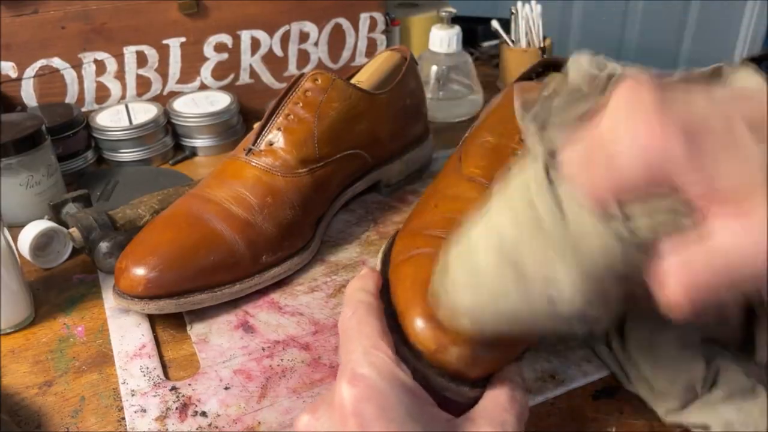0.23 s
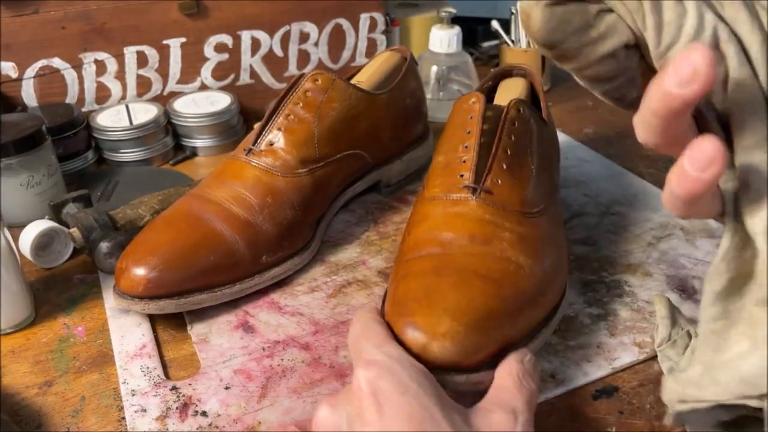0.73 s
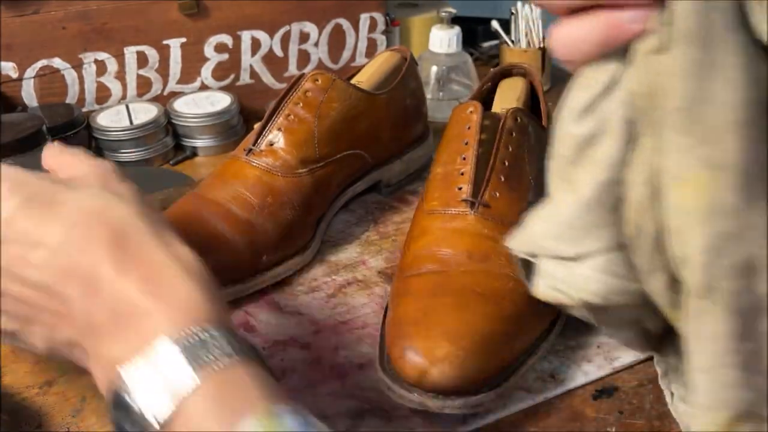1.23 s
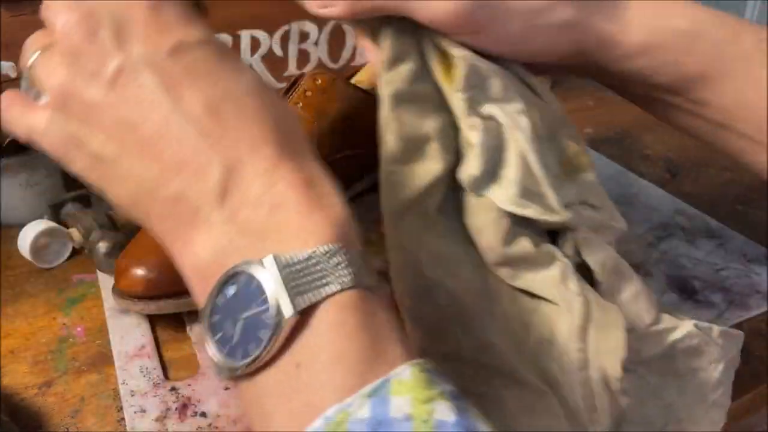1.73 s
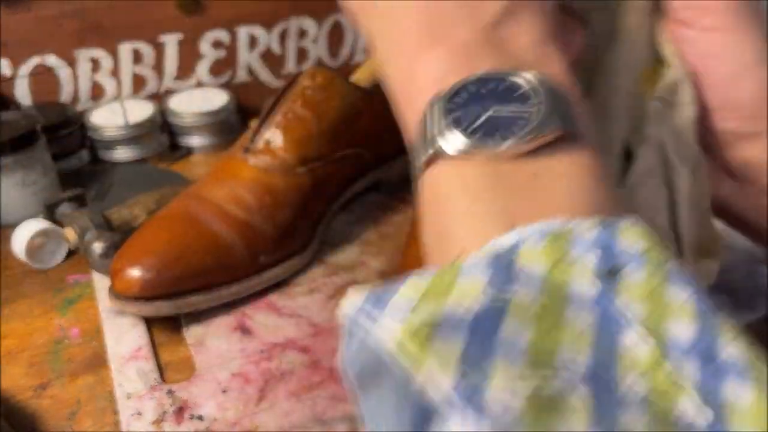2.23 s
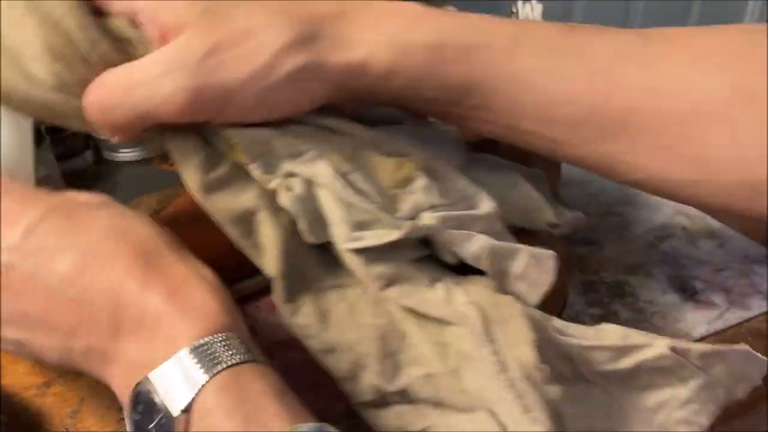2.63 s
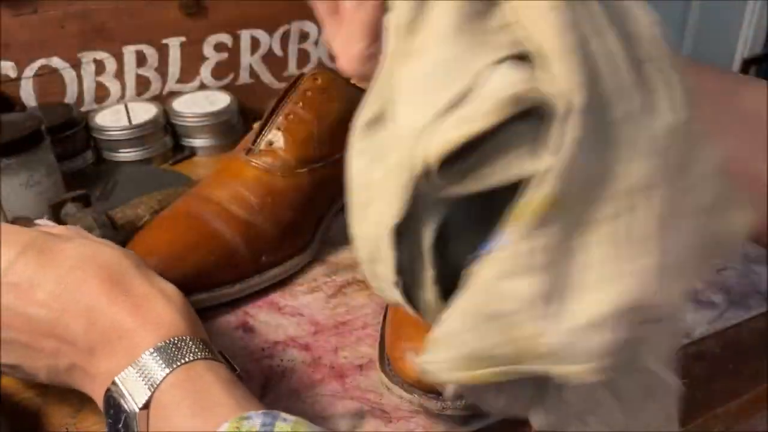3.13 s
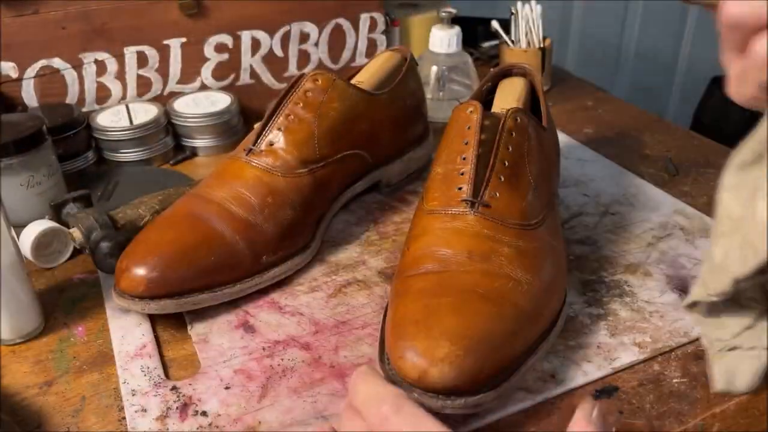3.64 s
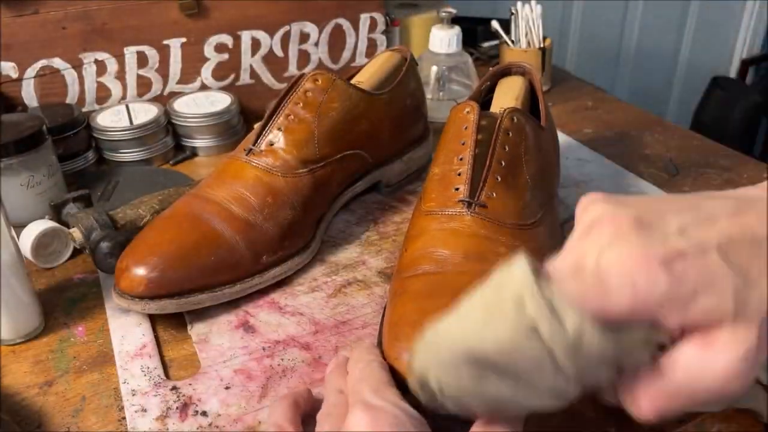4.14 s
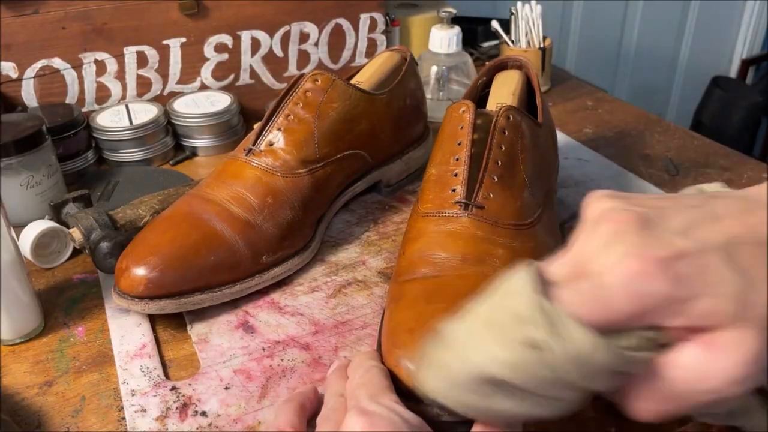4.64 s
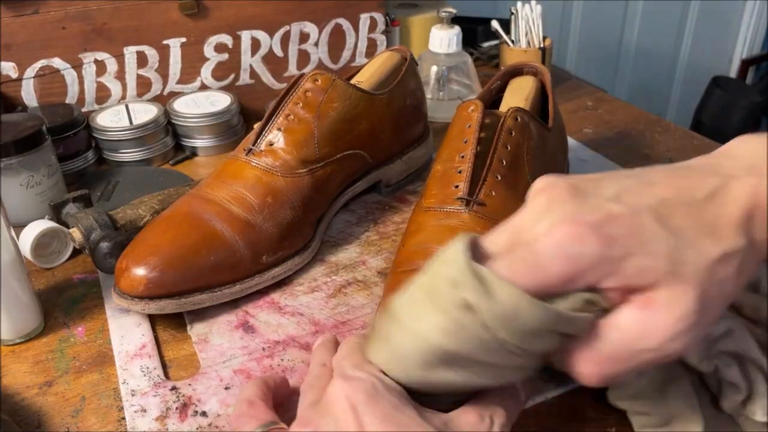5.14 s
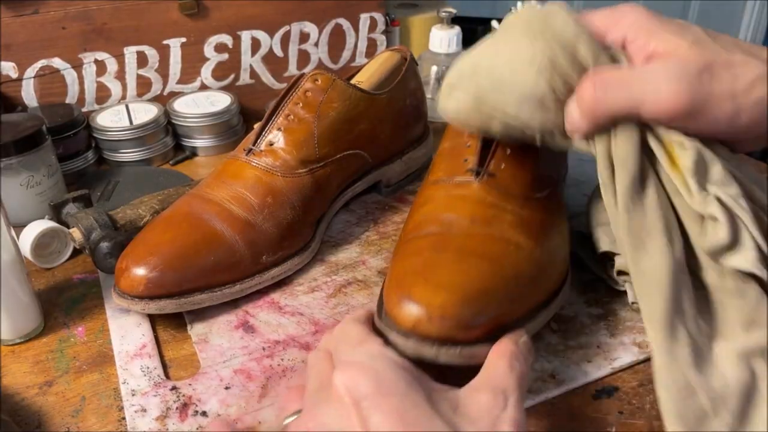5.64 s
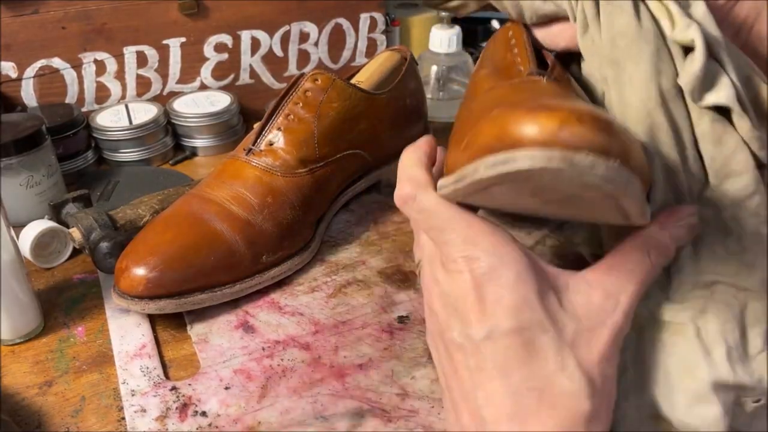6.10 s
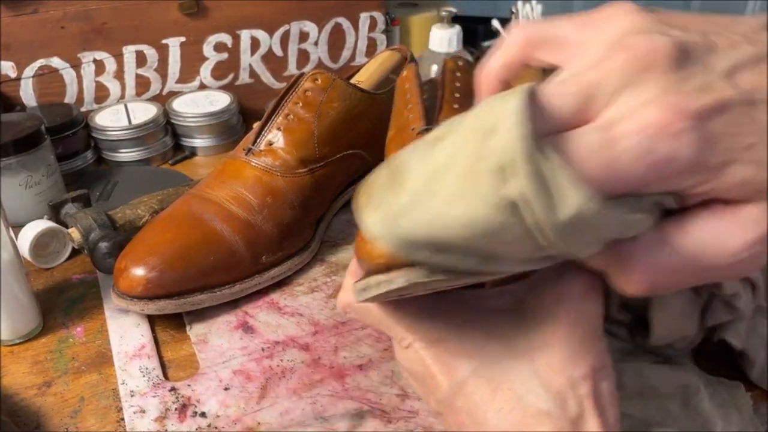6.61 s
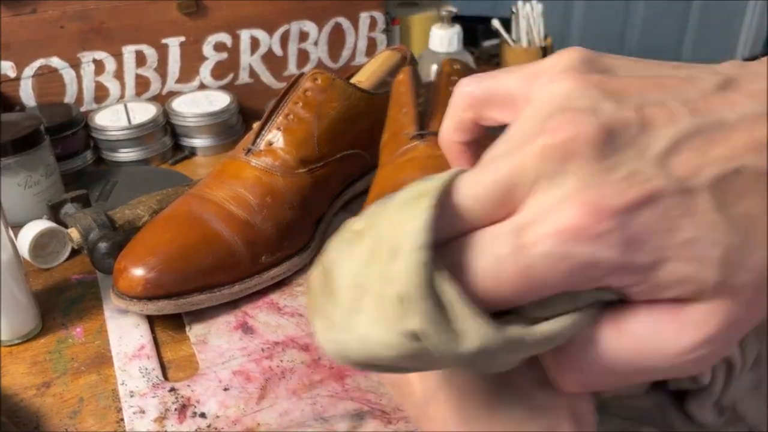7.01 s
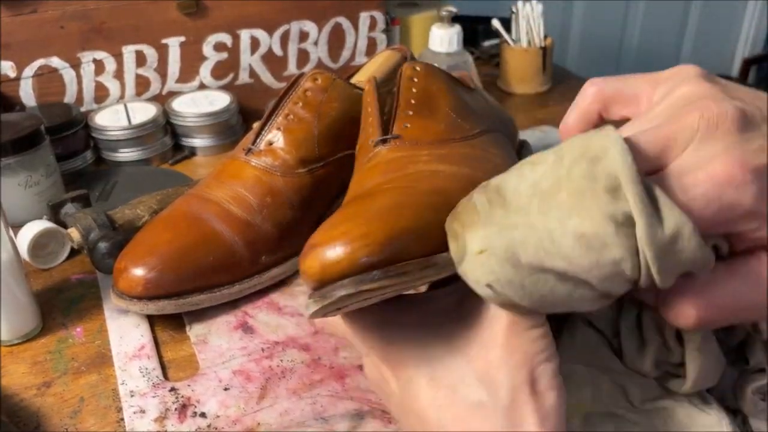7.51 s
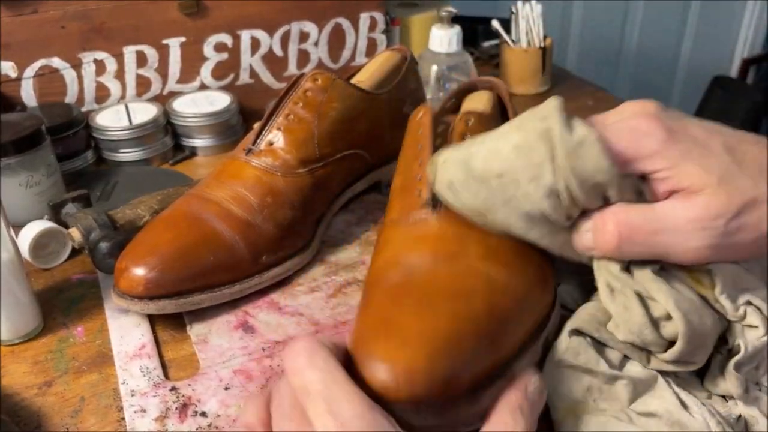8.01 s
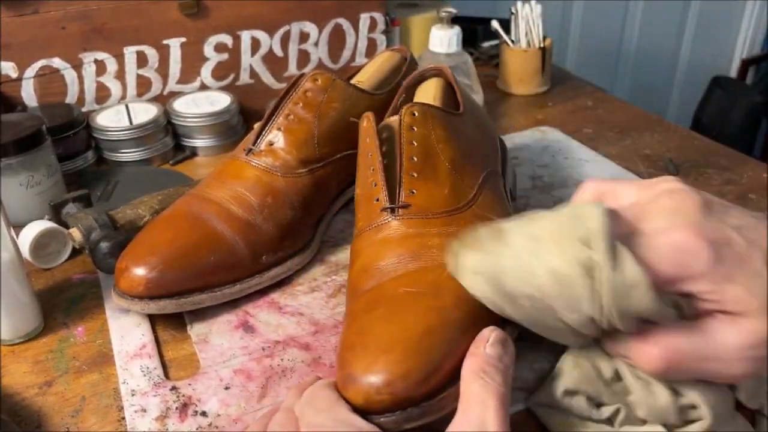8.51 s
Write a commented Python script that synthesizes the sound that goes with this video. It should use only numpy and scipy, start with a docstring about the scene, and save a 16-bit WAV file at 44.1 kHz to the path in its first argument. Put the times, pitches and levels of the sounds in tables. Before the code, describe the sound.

Over a steady low hum and airy rumble, a rag hisses briskly across a stiff shoe toe, then quietens into soft cloth movement and tiny taps. A sharp, woody bottle knock lands on the workbench with a short room echo. Gentle swishing wipes resume and grow brisker, joined by scrapes, a small squeak and firmer shoe taps near the end. The microphone is close, in stereo, in a small, fairly dry room.

```python
"""A cloth rag wipes a leather shoe on a wooden workbench in a small room, heard close by in stereo.
Throughout, a motor hums (a wavering sine) over ventilation rumble (noise with narrow resonances).
First, quick strokes hiss and rasp across the toe cap: noise and clicks, shaped in pitch and swelling.
Fainter strokes follow, with light taps, scrapes and a squeak; near 2.9 s a bottle lands with a hard knock.
Then the strokes grow stronger again, with scrapes, squeaks and harder taps of the shoe (ringing modes)."""
import sys
import numpy as np
from scipy import signal
from scipy.fft import rfft, irfft
from scipy.io import wavfile
from scipy.ndimage import uniform_filter1d

SR = 44100
rng = np.random.default_rng(int(sys.argv[2]) if len(sys.argv) > 2 else 0)


def ratio(d):
    """dB to gain"""
    e = np.asarray(d, float) / 20
    return 10 ** e


def inscribe(sig):
    """Save sig as 16-bit PCM at rate SR to the path in sys.argv[1].

    A 1-D sig is mono; a 2-D sig holds one channel per row.
    Samples are clipped to [-1, 1] before scaling.
    """
    pcm = np.round(np.clip(np.atleast_2d(sig).T, -1, 1) * 32767)
    wavfile.write(sys.argv[1], SR, pcm.astype(np.int16))


N = 386095
HZ = np.arange(N // 2 + 1) * SR / N  # the pitch of each spectrum point

# ringing modes of the shoe: (f/Hz, relative level/dB, time to fade by 60 dB/s)
SHOE = [(600, -0.5, 0.037), (825, -0.5, 0.019), (1210, 2, 0.011), (1334, 4, 0.013), (1600, -2.5, 0.026),
        (1840, -0.5, 0.0086), (2140, 0.5, 0.0092), (2480, -4, 0.019), (2746, -4.5, 0.02), (3026, -5, 0.015),
        (3580, -5, 0.0094), (4630, -5, 0.011), (5500, -9.5, 0.0085), (7800, 3.5, 0.01),
        (11000, -14, 0.0036)]
# ringing modes of the bench under the sole: (f/Hz, relative level/dB, time to fade by 60 dB/s)
THUMP = [(71.6, 2, .12), (109, -17, .08), (144, -1.5, 0.1), (256, -0.5, 0.048), (342, -1.5, 0.076),
         (459, -3, 0.049)]
# each slide of the cloth swells and dies away:
# (peak t/s, rise/s, fall/s, relative fibre hiss level/dB, hand pressure/dB)
STROKES = [(0, 0.034, 0.059, -56, -2), (0.148, 0.065, 0.029, -57, -3), (0.245, 0.043, 0.048, -57, -1.5),
           (0.383, 0.054, 0.046, -58, -3), (0.467, 0.027, 0.064, -55.0, -1.5),
           (0.684, 0.26, 0.17, -70.5, 0), (0.923, 0.133, 0.062, -66, -2.5),
           (1.031, 0.021, 0.032, -69.5, -11), (1.192, 0.101, 0.093, -78, -6),
           (1.435, 0.17, 0.076, -73, -3.5), (1.591, 0.11, 0.052, -79.0, -2), (1.885, 0.03, 0.046, -88, 7),
           (2.168, 0.074, 0.096, -74.5, 1), (2.601, 0.12, 0.36, -79.5, 2), (2.97, 0.076, 0.11, -78, 10.5),
           (3.117, 0.14, 0.064, -81, 10), (3.263, 0.036, 0.035, -83, -12), (3.371, 0.05, 0.095, -75, -12),
           (3.612, 0.18, 0.32, -73.5, 0.5), (3.875, 0.099, 0.071, -65.0, -2.0),
           (4.022, 0.056, 0.089, -72, -7), (4.197, 0.049, 0.054, -72.5, -7.0),
           (4.384, 0.083, 0.058, -66.5, -2.5), (4.471, 0.088, 0.077, -67, -3),
           (4.671, 0.111, 0.11, -62, -2), (4.854, 0.072, 0.067, -66.5, -3),
           (4.944, 0.016, 0.019, -63.5, -5), (5.118, 0.043, 0.16, -65.5, 0.5),
           (5.283, 0.112, 0.17, -74, -2.0), (5.56, 0.19, 0.08, -68, -5), (5.685, 0.064, 0.12, -71.5, 0.5),
           (5.837, 0.13, 0.11, -66.5, -2), (6.058, 0.14, 0.2, -64, -4), (6.199, 0.07, 0.066, -53.5, -8.5),
           (6.383, 0.055, 0.019, -58.5, -5), (6.45, 0.038, 0.034, -64.5, -3),
           (6.604, 0.023, 0.037, -64.5, -9.5), (6.695, 0.073, 0.19, -67, -3.5),
           (6.89, 0.052, 0.066, -63, -4.5), (7.085, 0.062, 0.052, -56.5, -4),
           (7.305, 0.11, 0.033, -63, -3.5), (7.402, 0.029, 0.03, -71.0, -2.5),
           (7.557, 0.033, 0.047, -59, -5.5), (7.745, 0.041, 0.075, -57.5, -9),
           (7.86, 0.077, 0.18, -59, -3.5), (8.067, 0.071, 0.05, -56, -3.5), (8.128, 0.05, 0.023, -57.5, -2),
           (8.23, 0.037, 0.04, -78, -4), (8.293, 0.007, 0.024, -55, -16.5),
           (8.355, 0.025, 0.029, -59.5, 2.5), (8.426, 0.11, 0.12, -66, -1), (8.597, 0.058, 0.06, -57.0, -1),
           (8.734, 0.12, 0.071, -61, -4.5)]


def on_log(table):
    """Read (Hz, value) points on a log-frequency axis."""
    hz, value = np.transpose(table)
    return np.interp(np.log(HZ + 1), np.log(hz), value)


def curve(s, db):
    """Turn a level curve into gain, practically silent outside its span."""
    return ratio(np.interp(np.arange(N) / SR, s, db, left=-120, right=-120))


def level(x, db):
    """Scale a sound to a chosen average strength (rms)."""
    return x * ratio(db) / np.sqrt(np.mean(x ** 2))


def resonance(hz, width_hz):
    """One broad peak, 1 at its centre and half that at half its width to either side."""
    return 1 / (1 + (2 * (HZ - hz) / width_hz) ** 2)


def spread(drive, gain):
    """Colour three unrelated drives: one shared by both ports, one for each alone."""
    # how alike left and right are: (f/Hz, likeness from 0 to 1)
    likeness = [(60, .995), (200, .985), (350, .85), (600, .45), (1400, .2), (2500, .5), (5500, .35),
                (6600, .45), (7500, .97), (8400, .97), (9400, .6), (10600, 1), (12000, 1), (13200, .45),
                (14000, 1), (15000, 1), (15400, .3)]
    like = np.clip(on_log(likeness), 0, 1)
    both, left, right = rfft(drive)
    shared = np.sqrt(like) * both
    separate = np.sqrt(1 - like) * np.array([left, right])
    return irfft(gain * (shared + separate), N)


def walk(rate):
    """Random values, each held for 1 / rate seconds, then smoothed twice into a slow wander."""
    hold = int(SR / rate)
    steps = np.repeat(rng.standard_normal(N // hold + 1), hold)
    return uniform_filter1d(uniform_filter1d(steps, hold), hold)[:N]


def swells(s, rise, fall, db):
    """Gain of overlapping rounded swells, their powers summed."""
    edge_db = -12  # how far a swell has dropped one rise before or one fall after its peak
    flat_top = 2.45  # 2 is a bell; more holds the top and steepens the edges
    t = np.arange(0, N + 64, 64)[:, None] / SR
    distance = np.abs((t - s) / np.where(t < s, rise, fall))
    swell_db = db + edge_db * np.minimum(distance ** flat_top, 20)
    power = np.sum(ratio(swell_db) ** 2, axis=1)
    return np.interp(np.arange(N) / SR, t[:, 0], np.sqrt(power))


def catches(rate, scatter_db):
    """Threads catching on the grain: scattered clicks, a few much larger, over plain noise."""
    hit = rng.random((3, N)) < rate / SR  # rate = average clicks per second
    size = ratio(scatter_db * rng.exponential(size=N))
    clicks = hit * rng.standard_normal((3, N)) * size
    return level(clicks, -2) + rng.standard_normal((3, N))


def ring(modes, contact_ms, spot_hz=None, bend_s=0.):
    """Modes struck by a short push, peak 1; longer contact dulls, and in a board the lows arrive later."""
    t = np.arange(SR // 3) / SR
    body = 0
    for k, (hz, db, t60) in enumerate(modes):
        if spot_hz:  # modes far in pitch from the spot's favourite are weaker, by 8 dB at most
            db = db - min(14.3 * abs(np.log2(hz / spot_hz)), 8.)
        lag = bend_s * max(np.sqrt(2000 / hz) - 1, 0)  # bending waves below 2 kHz travel slower
        age = np.maximum(t - lag, 0)
        sign = 1 if bend_s else (-1) ** k
        fade = np.exp(-np.log(1000) * age / t60)
        body = body - sign * ratio(db) * np.sin(2 * np.pi * hz * age) * fade
    push_s = max(contact_ms, .01) / 3000  # the push peaks a third of the way into the contact
    push = t[:512] * np.exp(-t[:512] / push_s)
    out = signal.fftconvolve(body, push)[:len(t)]
    return out / np.abs(out).max()


def crack(t60, top_hz):
    """The first instant of contact: a very short burst of noise."""
    t = np.arange(SR // 3) / SR
    burst = rng.standard_normal(len(t)) * np.exp(-np.log(1000) * t / t60)
    return signal.sosfilt(signal.butter(2, [1500, top_hz], "band", fs=SR, output="sos"), burst)


def add(track, s, sound, pan_db):
    """Mix a sound into the stereo track at s; pan_db is how much stronger the left is."""
    i = int(s * SR)
    sides = ratio(np.array([[pan_db], [-pan_db]]) / 2)
    track[:, i:i + len(sound)] += sound[:N - i] * sides


def machinery():
    """A motor hum at twice the mains rate that wavers slightly, over rumble with narrow resonances."""
    # ventilation rumble: (f/Hz, relative level per Hz/dB)
    air = [(15, -43.5), (25, -6), (65, -10.5), (97, -7), (124, -9), (167, -11.5), (224, -14), (293, -23),
           (385, -26.5), (678, -38), (846, -33.5), (957, -36.5), (4860, -60), (7210, -94.5), (9000, -101.5),
           (11700, -120), (19800, -120)]
    # resonances in the rumble: (f/Hz, width/Hz, boost/dB)
    duct = [(62, 22, 1), (95.5, 3, -7), (184.2, 14.2, 8.5), (218, 16.3, 9), (372.3, 35.7, 10),
            (411.5, 19.2, 9.5), (565, 142, 9.5), (790, 110, 5.5), (851, 11.3, 11), (1070, 11, 8)]
    hum_hz, hum_db, air_db = 119.65, -36.5, -41
    phase = 2 * np.pi * hum_hz * np.arange(N) / SR + 0.29 * walk(1.82)
    hum = np.sqrt(2) * ratio(hum_db + 0.26 * walk(3.9)) * np.sin(phase)
    peaks_db = sum(db * resonance(hz, width) for hz, width, db in duct)
    rumble = spread(rng.standard_normal((3, N)), ratio(on_log(air) + peaks_db))
    return hum + level(rumble, air_db)


def room(x):
    """Walls return each knock as a fading, darkening wash, different at each port."""
    t60_s = 0.22
    t = np.arange(SR // 2) / SR
    fade = np.exp(-np.log(1000) * t / t60_s)
    wash = rng.standard_normal((2, len(t))) * fade * (t > .004)  # the first return takes 4 ms
    wash = signal.lfilter([1], [1, -.6], wash)  # soften the treble
    wash = wash / np.sqrt(np.sum(wash ** 2) / 2)
    return signal.fftconvolve(x, wash, axes=1)[:, :N]


def bottle():
    """The bottle touches, lands and rocks, ringing a bench top too small to radiate deep bass."""
    # bottle meeting the bench: (t/s, relative level/dB, contact/ms)
    knocks = [(2.913, -31.5, 0.3), (2.9313, -4, 0.24), (2.937, -14, 0.33), (2.9435, -19, 0.22)]
    # ringing modes of the bench top: (f/Hz, relative level/dB, time to fade by 60 dB/s)
    bench = [(168, -2, 0.025), (264, -8.5, 0.028), (296, 8, 0.048), (341, -11.5, 0.051), (408, -9, 0.039),
             (457, -5.5, 0.16), (537.4, 0.5, 0.12), (675, 0, 0.017), (728, 5.5, 0.021), (855, -17, 0.029),
             (1002, -2.5, 0.055), (1060, -10.5, 0.061), (1240, -13, 0.077), (1460, -6, 0.024),
             (1680, -20, 0.025), (2080, -17.5, 0.037), (2400, -15, 0.015), (2650, -39, 0.037),
             (3130, -28, .02), (3530, -31, .02), (4200, -34, .16), (4926, -33.5, .02)]
    track = np.zeros((2, N))
    for s, db, contact_ms in knocks:
        knock = ring(bench, contact_ms, bend_s=.0013) + ratio(-33.5) * crack(.02, 5000.0)
        add(track, s, ratio(db) * knock, pan_db=0.0)
    return signal.sosfilt(signal.butter(2, 150., "high", fs=SR, output="sos"), track)


def taps():
    """The shoe clicks and thumps on the bench; the spot struck favours some of its modes."""
    # shoe tapping the bench:
    # (t/s, relative level/dB, pitch favoured by the spot struck f/Hz, contact/ms, thump level/dB)
    hits = [(0.364, -42, 600, 0.18, -6), (.873, -45, 1600, .08, 2), (0.94, -40, 1800, 0.15, 8),
            (1.043, -47.5, 1300, 0.099, -11), (1.468, -44.5, 800, 0.21, -10), (1.881, -50, 2020, 0.14, -10),
            (.568, -42, 700, .12, -3), (4.832, -44, 600, 0.15, 8), (5.389, -28.5, 1280, 0.014, -7),
            (5.396, -36, 2500, 0.033, -21), (5.401, -35, 1300, 0.054, -16), (5.408, -42, 2000, 0.065, -10),
            (5.813, -31.5, 790, 0.19, 1), (6.243, -43.5, 1300, .08, 2), (7.72, -33.5, 600, 0.02, 0),
            (8.185, -19.5, 1910, 0.21, -3.5), (8.348, -26, 1190, 0.16, 4.5), (8.358, -40, 2400, .06, 2),
            (8.372, -34, 1660, 0.078, 4), (8.633, -40.5, 750, 0.12, 3)]
    track = np.zeros((2, N))
    for s, db, spot_hz, contact_ms, thump_db in hits:
        click = ring(SHOE, contact_ms, spot_hz) + ratio(-26.0) * crack(.008, 14000.)
        thump = ratio(thump_db) * ring(THUMP, 0.59)
        add(track, s, ratio(db) * (click + thump), pan_db=0.2)
    return track


def drag():
    """Stick-slip shakes bench and shoe, and fingers slip on the leather with a hoarse squeak."""
    # sole dragged over the bench: (peak t/s, rise/s, fall/s, level/dB)
    scrapes = [(.684, .025, 0.078, -55), (.886, 0.026, .02, -46.5), (.93, 0.013, 0.093, -49.5),
               (1.48, 0.038, 0.022, -48), (6.07, 0.016, .1, -42), (6.15, .06, .05, -44.5),
               (6.216, 0.026, .045, -42.5), (7.722, 0.0028, 0.027, -40), (8.354, 0.044, 0.017, -42.5),
               (8.385, 0.033, 0.035, -46)]
    # fingers slipping on the leather: (peak t/s, rise/s, fall/s, level/dB)
    squeaks = [(.68, .03, .03, -63), (6.06, .02, .06, -59), (6.12, 0.043, 0.031, -56),
               (6.18, .025, 0.035, -58)]
    squeak_hz, squeak_width_hz = 1770, 260
    slips = catches(rate=420, scatter_db=3.0)
    body = ring(THUMP[3:], 0.19) + ratio(-8) * ring(SHOE, 0.69, 720.0)
    scrape = level(spread(slips, rfft(body, N)), 0) * swells(*np.transpose(scrapes))
    hoarse = spread(slips, resonance(squeak_hz, squeak_width_hz))
    squeak = level(hoarse, 0) * swells(*np.transpose(squeaks))
    return squeak + scrape


def toe_cap():
    """The first strokes cross the stiff toe cap: coarse, sparse catches ring it, more under a firm hand."""
    # resonances of the toe cap: (f/Hz, width/Hz, relative level/dB)
    peaks = [(1800, 290, -1), (2800, 650, 0)]
    rasp_per_pressure = 4.4  # dB gained per dB of pressure
    s, rise, fall, db, pressure_db = np.transpose(STROKES[:5])
    gain = sum(ratio(peak_db) * resonance(hz, width) for hz, width, peak_db in peaks)
    rasp = spread(catches(rate=610, scatter_db=2.0), gain)
    return level(rasp, 8.1) * swells(s, rise, fall, db + rasp_per_pressure * pressure_db)


def rag():
    """One sliding contact heard three ways: thin fibre hiss, swish of the grain, fuller leather below."""
    # colour of the fibre hiss: (f/Hz, relative level per Hz/dB)
    fibre = [(5000, -30), (6300, -5), (7000, -1), (8300, 0), (9300, -2), (10300, -6), (11500, -8),
             (13000, -9), (14500, -7), (15750, -8), (15900, -40)]
    # colour of the swish of the grain: (f/Hz, relative level per Hz/dB)
    grain = [(2200, 2), (3200, 5.5), (4500, 9), (5800, 8.5), (7000, -45.5)]
    # colour of the leather body: (f/Hz, relative level per Hz/dB)
    leather = [(300, -14), (700, 8.5), (1200, 2), (1500, 3.5), (1900, 1.5), (2400, -1), (2900, -5.5),
               (3400, -7), (4200, -26)]
    # the rag is never quite still in the hand: (t/s, relative rustle level/dB)
    rustle = [(0.0, -78), (1.09, -80), (2.19, -88), (3.29, -80.5), (4.38, -81.5), (5.47, -77.5),
              (6.57, -79.5), (7.67, -77.5), (8.76, -71.5)]
    body_per_pressure = 0.97  # dB gained per dB of pressure
    rustle_swish_db, rustle_body_db = 2, 8  # the idle rustle is duller than a stroke
    s, rise, fall, db, pressure_db = np.transpose(STROKES)
    idle = curve(*np.transpose(rustle))
    drive = catches(rate=3000, scatter_db=1.7) * ratio(2.0 * walk(45))  # uneven slide

    hiss_gain = np.hypot(swells(s, rise, fall, db), idle)
    hiss = level(spread(drive, ratio(on_log(fibre))), 1.3) * hiss_gain

    swish_gain = np.hypot(swells(s, rise, fall, db + pressure_db), ratio(rustle_swish_db) * idle)
    swish = level(spread(drive, ratio(on_log(grain))), 0.12) * swish_gain

    pressed = swells(s, rise, fall, db + body_per_pressure * pressure_db)
    body_gain = np.hypot(pressed, ratio(rustle_body_db) * idle)
    body = level(spread(drive, ratio(on_log(leather))), 2.4) * body_gain
    return hiss + swish + body


def scene():
    """Everything on the bench; the bottle, further off, stirs the room more than the shoe."""
    far, near = bottle(), taps()
    echoes = room(ratio(-12.5) * far + ratio(-17) * near)
    return machinery() + echoes + far + near + drag() + toe_cap() + rag()


def band_limit(x):
    """A steep low-pass at the top of the band."""
    return signal.sosfilt(signal.butter(12, 16430, fs=SR, output="sos"), x)


def record(dry):
    """The ports differ in phase and level with pitch, opposed near 8 and 14 kHz; the deepest bass is cut."""
    # the two microphone ports: (f/Hz, phase by which right leads/rad, left minus right level/dB)
    ports = [(0, 0, 0), (600, .8, -1), (1500, -.3, -1), (3300, 1.0, -2.5), (4700, .1, -3), (5700, .4, -3.5),
             (6500, -2.2, -2), (7500, -3.14, 0), (8400, -3.14, 0), (10600, -6.28, 0), (12000, -6.28, 0),
             (14000, -9.42, 0), (15000, -9.42, 0), (16000, -10.8, 0)]
    hz, lead, tilt_db = np.transpose(ports)
    turn = np.exp(.5j * np.interp(HZ, hz, lead))
    half = turn * ratio(-np.interp(HZ, hz, tilt_db) / 2)  # each port takes half of the difference
    dry = signal.sosfilt(signal.butter(4, 40., "high", fs=SR, output="sos"), dry)
    mix = irfft(rfft(dry) * np.array([1 / half, half]), N)
    return band_limit(mix)


dry = scene()
out = record(dry)
inscribe(out)
```